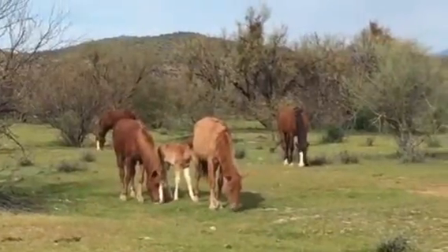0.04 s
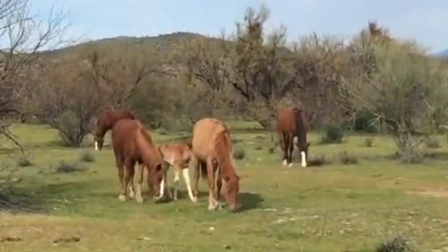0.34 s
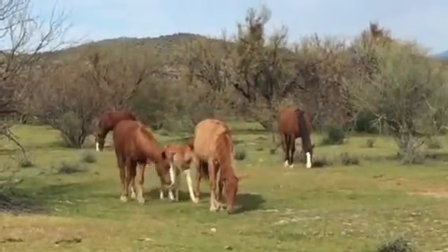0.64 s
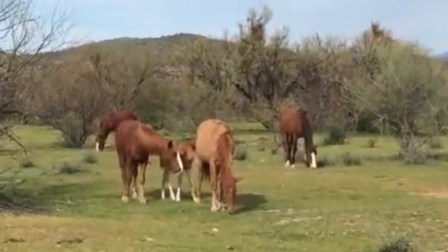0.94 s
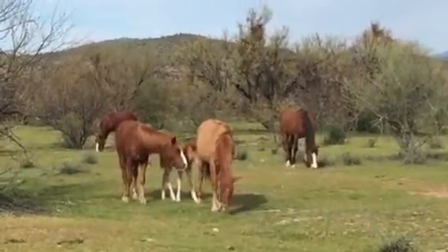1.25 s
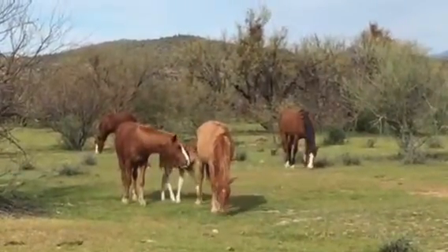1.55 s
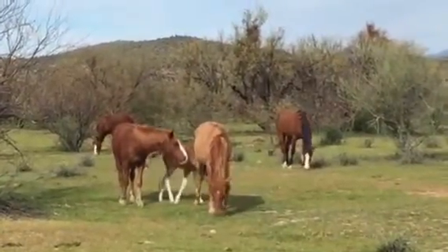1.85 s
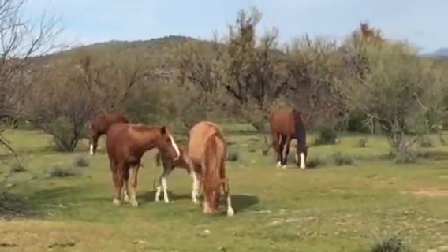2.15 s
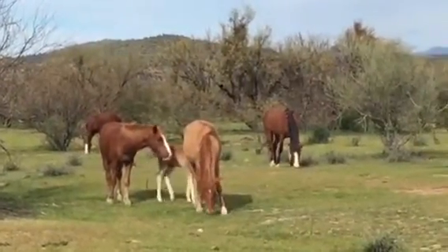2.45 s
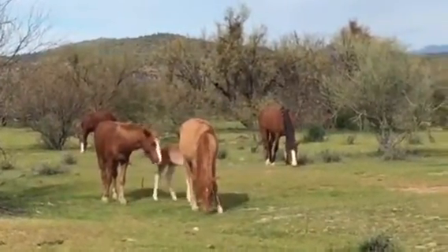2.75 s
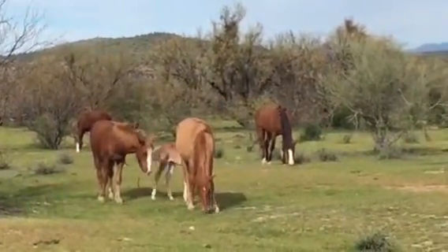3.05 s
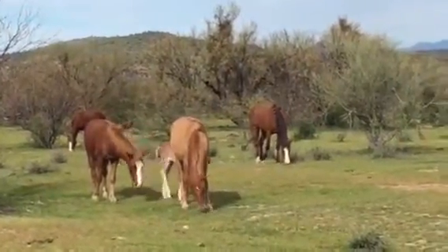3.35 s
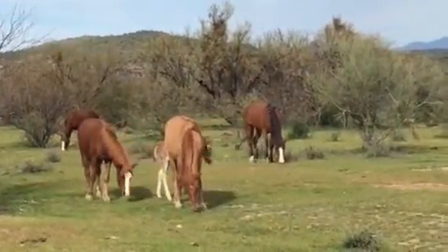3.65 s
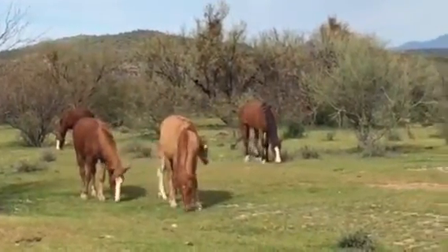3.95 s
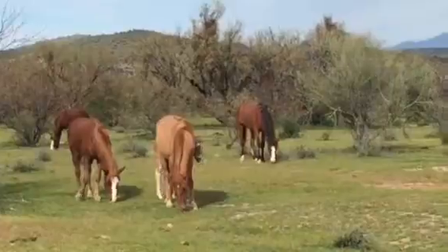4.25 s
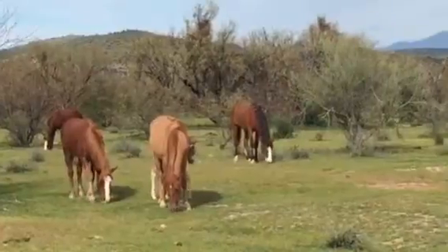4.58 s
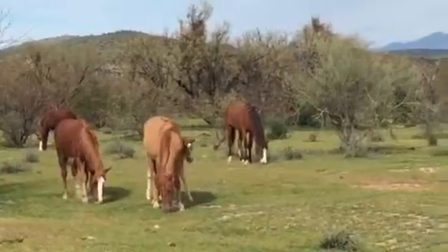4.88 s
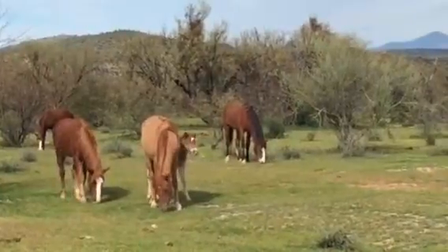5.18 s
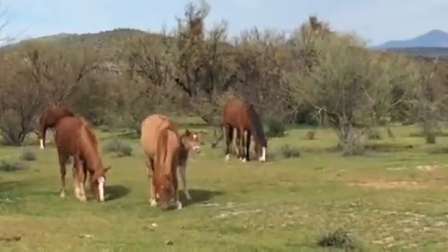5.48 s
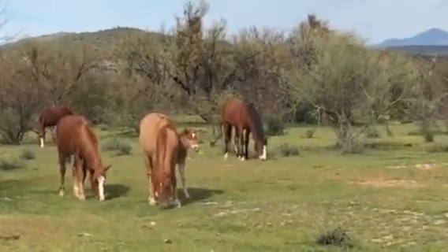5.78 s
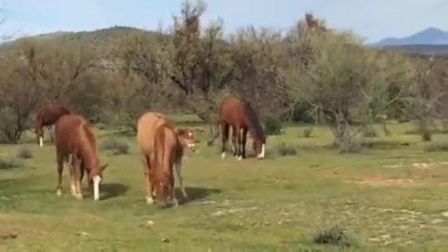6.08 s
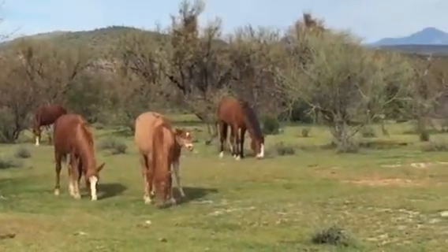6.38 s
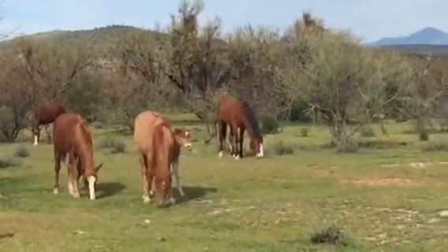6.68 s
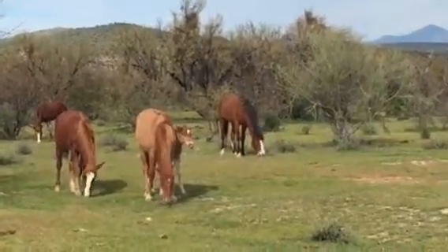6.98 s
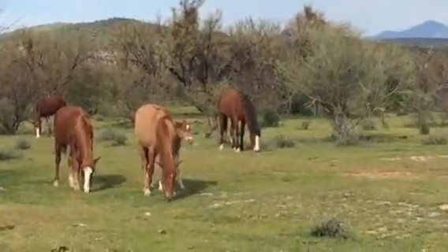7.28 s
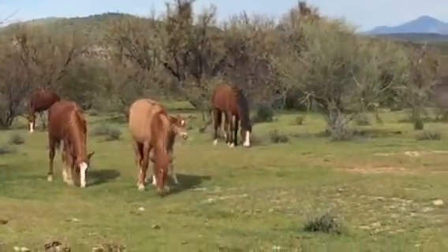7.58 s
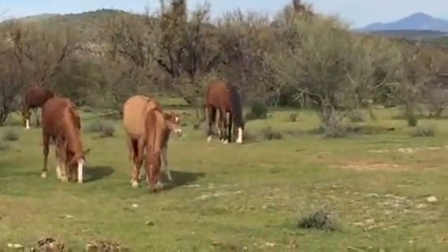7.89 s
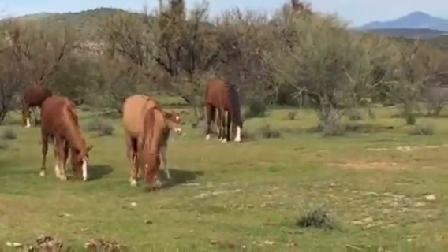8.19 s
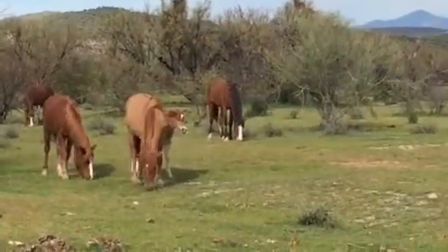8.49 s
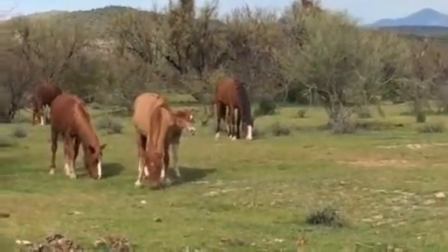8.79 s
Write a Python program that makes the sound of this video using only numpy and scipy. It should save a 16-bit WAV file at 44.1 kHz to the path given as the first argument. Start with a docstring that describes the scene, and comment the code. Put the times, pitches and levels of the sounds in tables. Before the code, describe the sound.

Soft wind thumps and rumbles on the microphone in a quiet meadow, with faint distant birds and horses cropping grass.

```python
"""A quiet meadow where horses graze in a light breeze.
Eddies brush the microphone port as soft low thumps over the uneven rumble of short gusts; late on,
the flow steadies to a drone. Small birds whistle and trill far off, a few dry stalks snap, and
the horses crop the grass in tiny crunches. A faint hum sinks in pitch at the start, one hollow
bump sounds midway, and a steady hiss of air and microphone lies under it all."""
import sys
import numpy as np
from scipy import signal
from scipy.fft import rfft, irfft
from scipy.io import wavfile
from scipy.ndimage import uniform_filter1d

SR = 44100
rng = np.random.default_rng(int(sys.argv[2]) if len(sys.argv) > 2 else 0)


def bounce(signal):
    """Save signal as a 16-bit WAV file at the path given by the first command-line argument."""
    frames = np.transpose(np.atleast_2d(signal))
    limited = np.clip(frames, -1, 1)
    pcm = np.round(limited * 32767).astype(np.int16)
    wavfile.write(sys.argv[1], SR, pcm)


N = 389403

# The big thumps, strong eddies crossing the port: (time [s], peak [dB], passing time [ms])
STRONG_EDDIES = [(.207, -45, 3.4), (.43, -47, 2.8), (.823, -44.5, 3.8), (.927, -55, 5.7), (1.185, -52, 3.4),
                 (1.759, -28.5, 2.86), (1.777, -31.5, 1.7), (1.794, -21.5, 1.82), (1.84, -28.5, 1.87),
                 (1.935, -35, 1.55), (2.019, -41.5, 1.9), (2.066, -37.5, 1.97), (2.393, -46, 2.7),
                 (2.412, -48.5, 4), (2.686, -43, 2.5), (2.74, -46, 2.3), (2.931, -35, 0.92),
                 (2.936, -21.5, 1.85), (2.950, -31.5, 4.8), (3.087, -41, 4), (3.26, -38, 2.5),
                 (3.302, -40, 4.3), (4.021, -47, 3.7), (4.331, -45.5, 5.6), (4.484, -51.5, 3.8),
                 (4.618, -51, 3.5), (5.060, -33, 5.9), (5.067, -33, 2.18), (6.846, -51.5, 2.4),
                 (7.921, -42, 2.7), (8.305, -50, 2.15)]

def eddies(rows, core=4.5, bass_cut_hz=50.5):
    """A vortex pulls, then pushes: the quicker, the brighter. The microphone's bass cut makes it ring."""
    out, lead_s = np.zeros(N), .06
    t = np.arange(SR // 5) / SR - lead_s
    for s, db, passing_ms in rows:
        position = t / (passing_ms / 1000)
        pressure = position / (1 + position ** 2 / core) ** core   # a compact core gives a round thud
        thump = filtered(pressure, bass_cut_hz, "high", order=5)
        add(out, s - lead_s, from_db(db) * thump / np.abs(thump).max())
    return out


# The bed of breeze between gusts: (time [s], level [dB])
BREEZE_LEVEL = [(0, -68), (.65, -72), (1.35, -67.5), (1.6, -72), (2.5, -71), (2.9, -64), (3.5, -66),
                (4.17, -62), (4.45, -69.5), (4.9, -72), (5.2, -65), (5.75, -73), (6.15, -66.5),
                (7.6, -67.5), (7.95, -61.5), (8.35, -66.5), (8.83, -61)]
# Short pushes of wind: (start [s], hold [s], level [dB])
GUST_CUES = [(.2, .24, -58), (1.772, .31, -40), (2.65, .1, -55.5), (3.09, 0.061, -54.5),
             (3.25, 0.07, -54.5), (5.04, 0.052, -52), (6.46, 0.12, -60)]
# The bass-heavy tone of turbulence: (frequency [Hz], level [dB per Hz])
WIND_COLOUR = [(25, -19), (45, -5), (70, 2), (100, 1), (130, -3.5), (160, -12), (210, -13.5), (280, -23.5),
               (380, -32), (460, -51)]

def wind(breeze_db):
    """Gusts ride on the breeze and buffet the port with a fluttering rumble."""
    gusts = swells(GUST_CUES, attack_s=.017, sag_db_per_s=20, release_s=.017)
    return rumble(np.hypot(from_db(breeze_db), gusts), WIND_COLOUR, evenness=.6, flutter_db=3)


def small_eddies(breeze_db, per_s=7, above_db=8.5, spread_db=1.5, typical_ms=3.43):
    """Light thumps from weak eddies at random moments, following the level of the breeze."""
    waits, sizes, durations = rng.random((96, 3)).T
    times = np.cumsum(2 * waits) / per_s
    peak_db = np.interp(times, np.arange(N) / SR, breeze_db) + above_db + spread_db * (2 * sizes - 1)
    passing_ms = typical_ms * 2 ** (durations - .5)
    return eddies(np.column_stack([times, peak_db, passing_ms])[times < N / SR])


# Spells of steadier flow: (start [s], hold [s], level [dB])
DRONE_CUES = [(0, .37, -61), (7.06, 1.085, -53), (8.5, .33, -58)]
# Their narrow, low tone: (frequency [Hz], level [dB per Hz])
DRONE_TONE = [(45, -18.5), (68, -7), (95, 1), (125, -1), (145, -17), (175, -22.5)]

def drone():
    """Steady flow over the port holds a smooth, low drone."""
    strength = swells(DRONE_CUES, attack_s=.089, sag_db_per_s=.9, release_s=.059)
    return rumble(strength, DRONE_TONE, evenness=.86, flutter_db=.5)


def swells(rows, attack_s, sag_db_per_s, release_s):
    """Strength of the flow: each swell rises, sags while it holds, then dies away."""
    t, power = np.arange(N) / SR, 1e-14
    for s, hold, db in rows:
        held = from_db(db - sag_db_per_s * np.clip(t - s, 0, hold))
        fade = np.maximum(s - t, 0) / attack_s + np.maximum(t - s - hold, 0) / release_s
        power = power + (held * np.exp(-np.minimum(fade, 20))) ** 2
    return np.sqrt(power)


def rumble(strength, colour, evenness, flutter_db):
    """Small eddies merge into a rumble that follows the strength of the flow and flutters with it."""
    flow = noise(colour, skirt_db=30)
    power = uniform_filter1d(flow ** 2, size=3000) + 1e-9
    flutter = from_db(flutter_db * noise([(7, 0), (16, 0)], skirt_db=23.5))
    return strength * rms_one(flutter * flow / power ** (evenness / 2))


# Dry snaps, tearing grass and dull scuffs:
# (time [s], level [dB], centre [Hz], decay [s], crunch relative to the snap [dB])
STALK_SNAPS = [(1.615, -69, 1740, .01, -6), (2.27, -64, 2700, .0044, -8), (3.135, -66, 480, .011, -6),
               (3.67, -64.5, 2700, .0035, -10), (3.96, -63, 1900, .008, -9),
               (5.402, -52.5, 2500, .0024, -12), (5.734, -64, 1720, .008, 2),
               (6.372, -50, 1450, 0.00054, -22), (7.08, -65, 820, 0.17, -1), (7.72, -67, 1900, .004, -10),
               (8.457, -65, 2100, .005, -10), (8.634, -66.5, 1570, .005, -6)]

def snaps(crunch_s=.018, spread=1.45, splinter_db=-11.5, knock_db=-14, knock_hz=590, knock_s=.015):
    """Fibres crunch, then break at once; brittle stalks also knock and splinter in the treble."""
    out, lead_s = np.zeros(N), .04
    t = np.arange(SR // 5) / SR - lead_s
    after = np.maximum(t, 0)
    for s, db, hz, decay_s, crunch_db in STALK_SNAPS:
        fracture = (t >= 0) * np.exp(-after / decay_s)
        crunch = from_db(crunch_db) * np.exp(-np.abs(t) / crunch_s)
        fibres = (fracture + crunch) * rng.standard_normal(len(t))
        brittle = min(hz / 2500, 1) ** 2
        splinter = from_db(splinter_db) * brittle ** 2 * fibres
        knock = from_db(knock_db) * brittle * np.exp(-after / knock_s)
        knock *= np.sin(2 * np.pi * knock_hz * after)
        snap = filtered(fibres, [hz / spread, hz * spread], "band") + splinter
        add(out, s - lead_s, from_db(db) * (snap / np.abs(snap).max() + knock))
    return out


def bump(start_s=5.208, hz=250, peak_db=-56.5, rise_s=.0097):
    """A soft, hollow bump that swells and rings for a few cycles."""
    t = np.maximum(np.arange(N) / SR - start_s, 0)
    envelope = t / rise_s * np.exp(1 - np.minimum(t / rise_s, 40))
    return from_db(peak_db) * envelope * np.sin(2 * np.pi * hz * t)


# Single far-off calls: (time [s], length [s], start pitch [Hz], end pitch [Hz], dry peak [dB])
BIRD_NOTES = [(.675, .046, 5600, 5200, -78), (.748, .024, 3840, 2900, -73.5),
              (1.595, .038, 1547, 1674, -75), (1.782, 0.057, 1780, 2110, -70.5),
              (3.212, .033, 1680, 1780, -79), (3.257, 0.044, 1790, 2070, -69), (4.46, .09, 6120, 4940, -85)]

def birds(notes, waver, echo_db, echo_s):
    """Short gliding whistles, scattered by the brush into a soft tail."""
    out = np.zeros(N)
    for s, length, start_hz, end_hz, db in notes:
        progress = np.linspace(0, 1, int(length * SR))
        wobble = np.interp(progress, np.linspace(0, 1, 8), rng.standard_normal(8))
        hz = (start_hz + (end_hz - start_hz) * progress) * (1 + waver * wobble)
        envelope = np.sqrt(np.abs(np.sin(np.pi * progress)))
        add(out, s, from_db(db) * envelope * np.sin(2 * np.pi * np.cumsum(hz) / SR))
    t = np.arange(SR // 2) / SR
    brush = rng.standard_normal(len(t)) * np.exp(-t / echo_s)
    return out + from_db(echo_db) * signal.fftconvolve(out, brush / np.linalg.norm(brush))[:N]


def trill(start_s=.368, step_s=.0855, chirp_s=.028, glide_hz=(4120, 3360), db=-77.5, fade_db_per_s=6):
    """One bird repeats a falling chirp evenly, fading as it goes."""
    chirps = [(start_s + t, chirp_s, *glide_hz, db - fade_db_per_s * t) for t in step_s * np.arange(7)]
    return birds(chirps, waver=.018, echo_db=-3, echo_s=.05)


def grazing(per_s=8, level_db=-76, bite_s=.0049, band_hz=(900, 2800)):
    """The horses crop the grass: tiny crunches at random moments, barely above the hiss."""
    waits, sizes = rng.exponential(1, (2, 128))
    t = np.arange(SR // 20) / SR
    force = np.zeros(N)
    for s, size in zip(np.cumsum(waits) / per_s, np.minimum(sizes, 2)):
        add(force, s, from_db(level_db + 2.7 * (size - 1.5)) * np.exp(-t / bite_s))
    return force * rms_one(filtered(rng.standard_normal(N), band_hz, "band"))


# A faint, sinking hum: (time [s], pitch [Hz], level [dB])
HUM_GLIDE = [(.2, 365, -100), (.33, 375, -75), (.6, 355, -79.5), (.77, 325, -74), (.85, 315, -110)]

def far_hum(blur_hz=40):
    """A low tone, blurred by distance into a narrow band."""
    hz, db = in_time(HUM_GLIDE)
    blur = rms_one(filtered(rng.standard_normal(N), blur_hz, "low"))
    return from_db(db) * blur * np.sqrt(2) * np.sin(2 * np.pi * np.cumsum(hz) / SR)


# The soft wash of still air: (frequency [Hz], level [dB per Hz])
AIR_COLOUR = [(60, -2), (150, -2), (260, 0), (430, -3), (700, -8.5), (1220, -11), (1890, -11.5),
              (2500, -12.5), (4000, -15.5)]
# Thin microphone hiss on top: (frequency [Hz], level [dB per Hz])
HISS_COLOUR = [(3600, -5), (4400, -2), (4900, -5), (5400, -1.5), (6700, -2), (7700, -5.5), (8400, -3.5),
               (9600, -4), (10400, -9.5), (11100, -6), (13000, -7), (15700, -9)]

def air_and_hiss(air_db=-74.5, hiss_db=-80.5):
    """Still air and the microphone's own noise lay a steady bed."""
    air = from_db(air_db) * noise(AIR_COLOUR, skirt_db=27.5)
    return air + from_db(hiss_db) * noise(HISS_COLOUR, skirt_db=32)


def noise(colour, skirt_db):
    """Unit-power noise of a given colour, falling by skirt_db an octave beyond its ends."""
    hz, db = np.transpose(colour)
    octave, points = np.log2(np.maximum(np.fft.rfftfreq(N, 1 / SR), 1)), np.log2(hz)
    beyond = np.abs(octave - np.clip(octave, points[0], points[-1]))
    gain = from_db(np.interp(octave, points, db) - skirt_db * beyond)
    return rms_one(irfft(rfft(rng.standard_normal(N)) * gain, N))


def from_db(db):
    """Decibels to gain."""
    return 10 ** (np.asarray(db) / 20)


def rms_one(x):
    """Scale to unit power."""
    return x / np.sqrt(np.mean(x ** 2) + 1e-20)


def in_time(rows):
    """Each column of a curve, sample by sample."""
    s, *columns = np.transpose(rows)
    return [np.interp(np.arange(N) / SR, s, column) for column in columns]


def filtered(x, hz, kind, order=2):
    """Causal Butterworth filter."""
    return signal.sosfilt(signal.butter(order, hz, kind, fs=SR, output="sos"), x)


def add(out, s, sound):
    """Mix a sound in from a given time."""
    i = max(round(s * SR), 0)
    out[i:i + len(sound)] += sound[:max(N - i, 0)]


def scene():
    """The mono mix: wind at the port up front, the meadow far behind."""
    breeze_db, = in_time(BREEZE_LEVEL)
    front = wind(breeze_db) + drone() + eddies(STRONG_EDDIES) + small_eddies(breeze_db)
    calls = birds(BIRD_NOTES, waver=.007, echo_db=-8, echo_s=.028) + trill()
    meadow = air_and_hiss() + snaps() + bump() + grazing() + far_hum()
    return (front + calls + meadow)[None]


def record(dry, cutoff_hz=15720):
    """A steep low-pass trims the very top."""
    return signal.sosfilt(signal.ellip(12, .1, 70, cutoff_hz, fs=SR, output="sos"), dry)


dry = scene()
out = record(dry)
bounce(out)
```